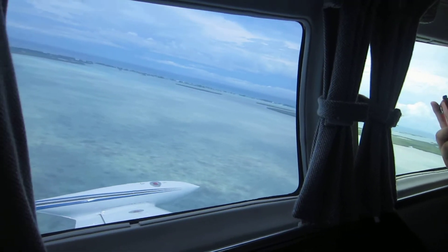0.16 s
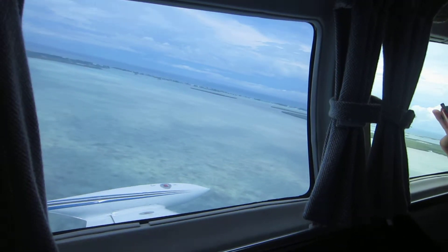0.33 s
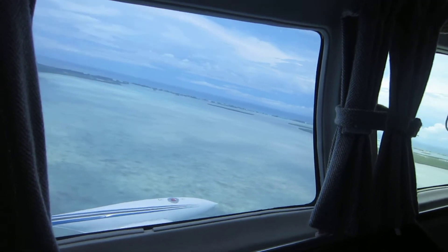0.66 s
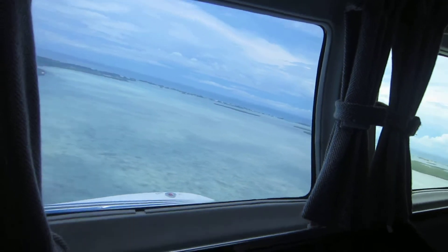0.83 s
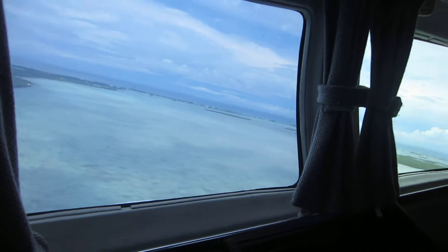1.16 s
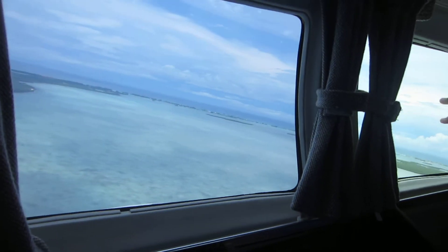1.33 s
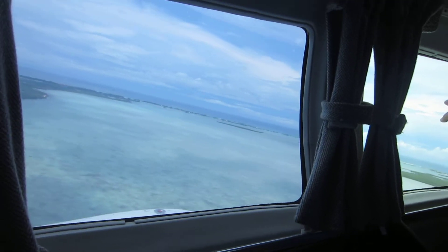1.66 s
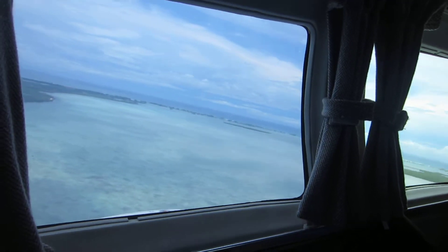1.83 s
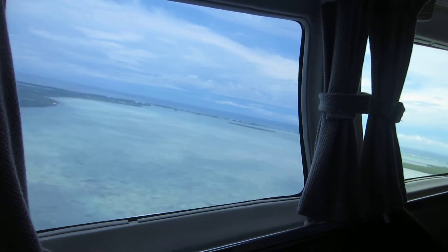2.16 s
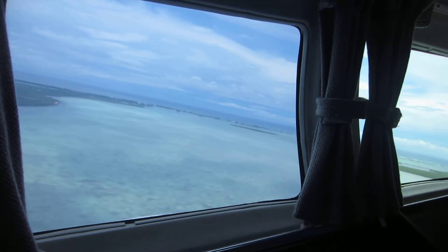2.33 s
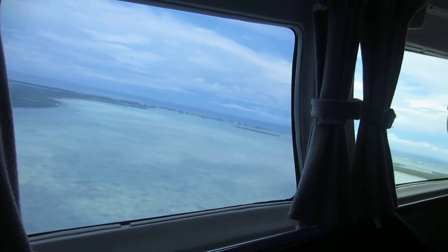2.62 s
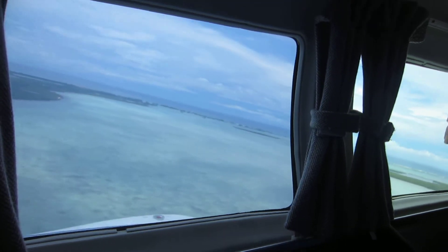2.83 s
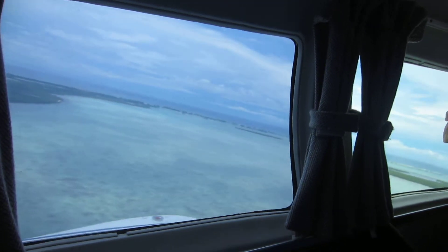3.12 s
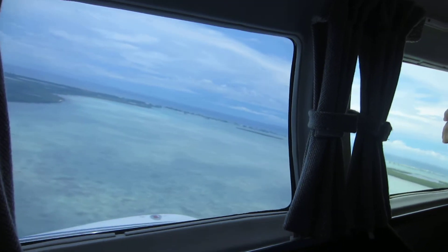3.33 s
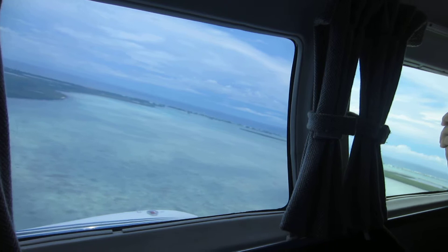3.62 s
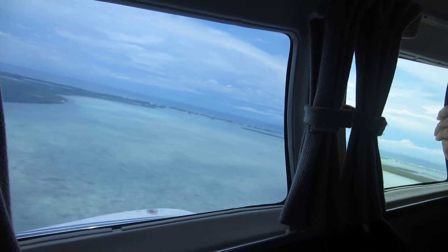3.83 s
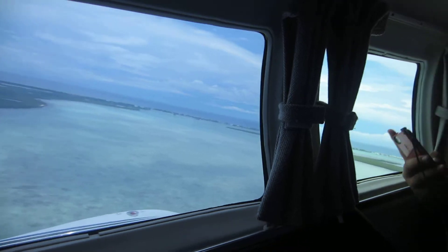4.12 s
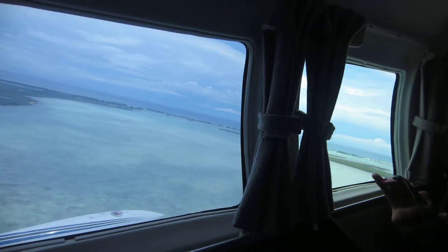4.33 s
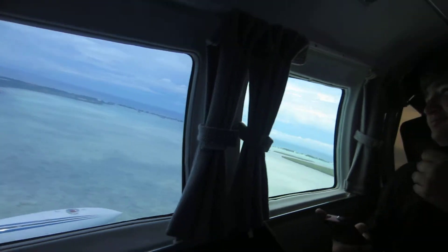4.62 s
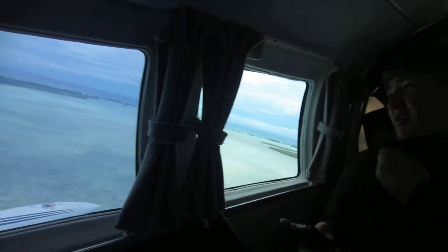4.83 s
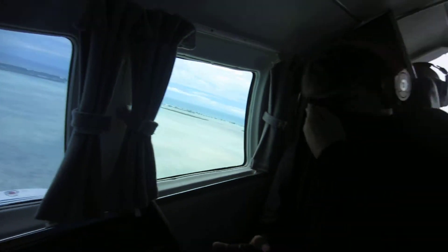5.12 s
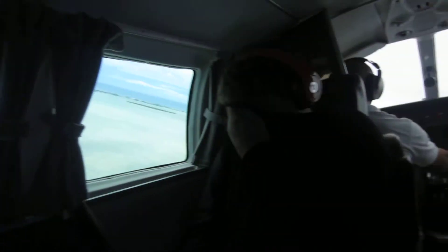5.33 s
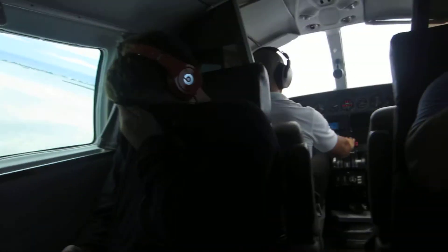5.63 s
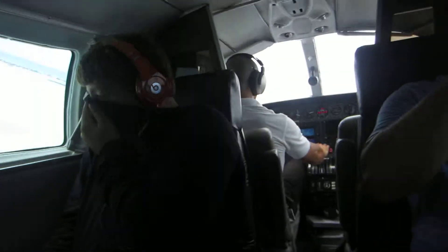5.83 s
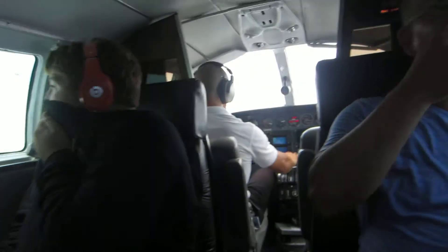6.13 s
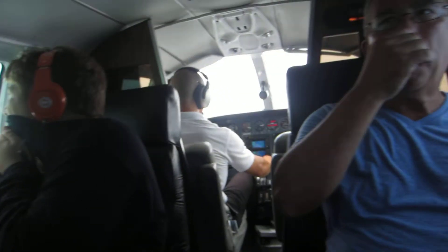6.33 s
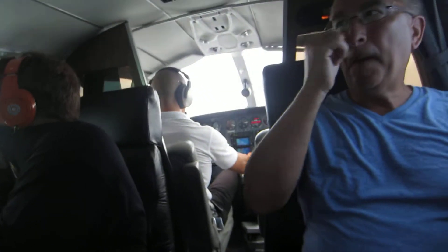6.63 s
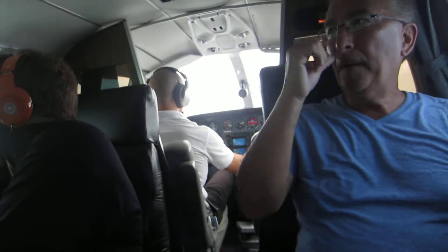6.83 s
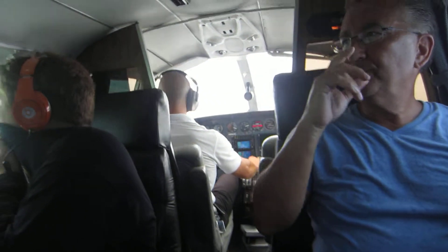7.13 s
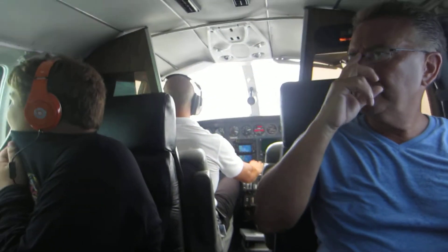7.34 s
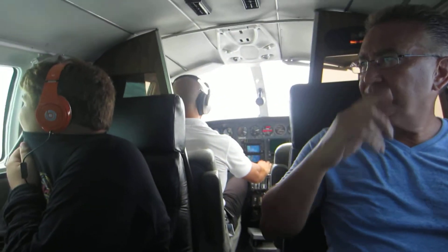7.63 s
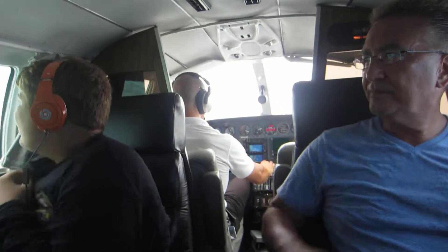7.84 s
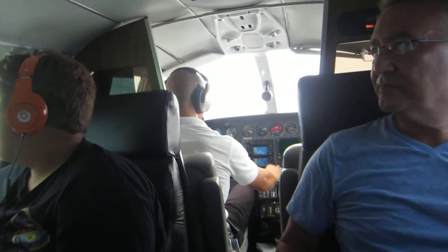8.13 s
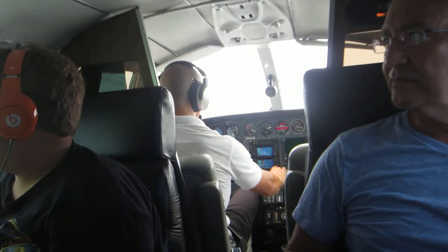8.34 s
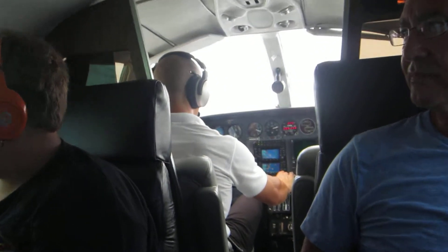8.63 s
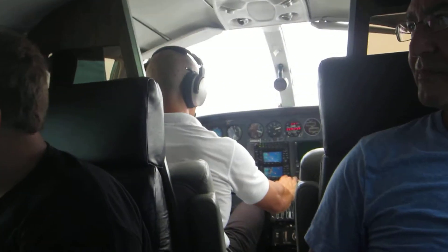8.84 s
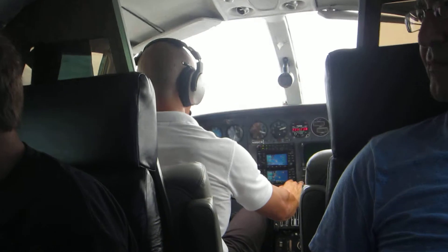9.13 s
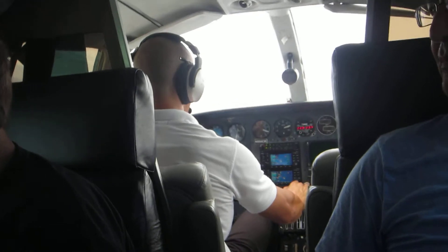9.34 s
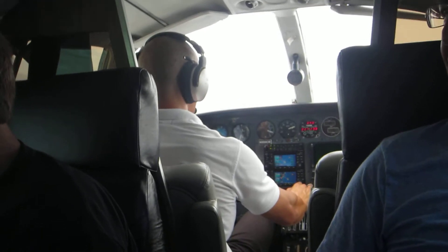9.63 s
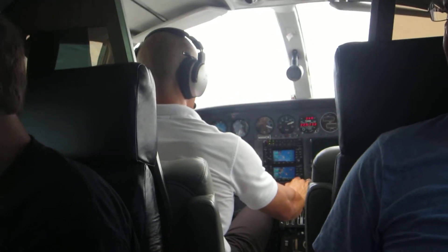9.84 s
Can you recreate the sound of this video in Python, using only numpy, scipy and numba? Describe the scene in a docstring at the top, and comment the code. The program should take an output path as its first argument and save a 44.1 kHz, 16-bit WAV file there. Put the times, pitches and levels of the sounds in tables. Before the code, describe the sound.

Twin propeller engines drone in a small cabin, their low hum swelling and fading over constant rushing air.

```python
"""A deep, slowly beating hum over a steady roar of air: the cabin of a small twin-engined propeller plane.
Two six-cylinder engines with three-blade propellers run slightly apart in speed, so their tones beat at
the difference frequency, faster as the power is eased back. The turbulent slipstream roars on the hull.
A hand-held camera turns from a window to the aisle through the cabin's standing waves. Fingers knock on
it, its zoom switches a treble dip on and off with a click, and its gain control rides the swells."""
import sys
import numpy as np
from scipy import signal
from scipy.fft import rfft, irfft, next_fast_len
from scipy.io import wavfile
from scipy.ndimage import uniform_filter1d
from numba import njit

SR = 44100
rng = np.random.default_rng(int(sys.argv[2]) if len(sys.argv) > 2 else 0)


def to_wav(sig):
    """Store sig (one row per channel, or 1-D mono) as 16-bit WAV at the path in sys.argv[1].

    Samples outside -1..1 are clipped; the rate is SR.
    """
    pcm = np.clip(np.atleast_2d(sig), -1, 1) * 32767
    pcm = np.round(pcm).astype(np.int16)
    wavfile.write(sys.argv[1], SR, pcm.T)  # frames by channels


N = 439677

# Slipstream spectrum through the hull: f/Hz, density at window/dB, at aisle/dB, side minus mid/dB
ROAR_SPECTRUM = [(30, -78.5, -77, -28), (42, -63, -59.5, -25), (75, -60.5, -58.5, -20.5),
                 (100, -54, -52.5, -9), (170, -54.5, -52.5, -11), (412, -58.5, -53, -23),
                 (590, -60, -51.5, -17.5), (865, -67, -62.5, -18), (1330, -68, -72, -12.5),
                 (1680, -73.5, -71.5, -9.5), (2420, -77, -75.5, -10), (3980, -88, -86, -8),
                 (7060, -96.5, -94.5, -5), (9570, -103, -103, -4), (11900, -122, -122, -1)]
# Panel and cavity resonances, and a narrow dip in the hiss at 12 kHz:
# f/Hz, width/Hz, gain at window/dB, at aisle/dB
RESONANCES = [(544.4, 81, 9, -5.5), (1039, 45, 7.5, 7), (1321, 62, 5, 3.5), (1452, 110, 1, 8.5),
              (7800, 760, 3.5, 5), (12000, 900, -8.5, -8.5)]
# Finger contacts on the camera: t/s, ring level/dB, click level/dB, contact time/s
KNOCKS = [(3.292, -11, -32, 0.004), (3.599, -10, -20.5, 0.0022), (5.029, -60, -48, .0004)]
# Modes of the camera body: f/Hz, level/dB, t60/s
BODY_MODES = [(714, 4.5, .05), (467, -0.5, 0.05), (190, -10.5, 0.051)]
# Switching on, then off, of the zoom's filter: t/s, click level/dB
ZOOM_SWITCHES = [(6.873, -32), (9.457, -37)]
# Response of that filter: f/Hz, gain/dB
ZOOM_DIP = [(2000, 0), (3200, -3.5), (4100, -13), (4900, -7), (6000, -4.5), (8500, -2), (10500, 1)]
# Camera's course: t/s, turn (0 window, 1 aisle), lean to the slower engine/dB, roar gain/dB
CAMERA_COURSE = [(0, 0, -0.5, -1.3), (.5, 0.11, 1.6, 1.5), (1, 0, -0.1, -0.1), (4.2, 0, .1, 1.14),
                 (4.8, 0.07, 2.5, 0), (5.2, 0.31, -3.5, 0.3), (5.5, .32, .1, 0.7), (6, 0.59, 0.8, 0.6),
                 (6.4, .99, 2.3, 0.1), (7.6, .99, -1.5, 0.95), (8.1, 0.9, -0.6, 2), (8.7, .99, 2, -0.1),
                 (9.4, 0.96, 0.9, 0.4), (9.97, 1, 4, 1)]
# Blade-passing rates of the two propellers: t/s, mean f/Hz, difference/Hz
BLADE_RATES = [(0, 130.7, .445), (2.028, 130.6, .343), (3.084, 130.6, .83), (4.073, 130.3, .455),
               (5.1, 131.1, .744), (6.045, 130.7, 1.01), (6.436, 129.7, 2.463), (7.093, 128.8, 2.479),
               (7.498, 128.4, 1.696), (8.44, 127.6, 1.3), (9.1, 125.6, 1.62), (9.97, 123, 1.56)]
# Blade harmonics 1-5 in the standing waves: slower engine's level/dB at window, half turned and at aisle,
# the same three for the faster engine, loss below FULL_RATE_HZ/(dB/Hz), share of the lean (0-1)
BLADE_TONES = [(-12, -19, -19, -17.5, -21, -19.5, 0.1, 0.97),
               (-32.5, -25.5, -26.5, -33.5, -27.5, -31.5, -0.26, 0.81),
               (-42.5, -30.5, -33.5, -41, -32.5, -30, 2.5, .05),
               (-40.5, -37.5, -38.5, -42, -38.1, -39, 1.5, .05),
               (-47.5, -44, -42, -46.5, -43.1, -41, 4.5, .05)]
# Extra path of the faster engine's fundamental: turn (0-1), path/cycles
FUNDAMENTAL_PATH = [(.3, 0.51), (.6, 0.027)]
# Exhaust and crankcase lines: multiple of the four-stroke cycle rate, level at window/dB, at aisle/dB,
# extra path of the faster engine/cycles
ENGINE_ORDERS = [(3, -45, -44.5, 0.24), (4, -45, -42.5, .4), (5, -50, -49, 0.058), (7, -47, -50, .7),
                 (8, -39.5, -38.5, .35), (9, -43.5, -37, .55), (10, -40, -38.5, 0.69), (11, -47, -41, 0.16),
                 (14, -56.5, -45.5, .8), (15, -49, -53.5, .6), (17, -45, -52.5, .9), (48, -51, -56, .2)]

UPPER_PATH = (.52, 0, .42, .97)  # extra path/cycles of the faster engine's harmonics 2-5, at any turn
PASSES_PER_CYCLE = 6  # three blades, two revolutions per four-stroke cycle
FULL_RATE_HZ, HALF_TURNED = 128.3, .32
CLICK_CYCLES = 5.4  # a click's bandwidth times its contact time
LEFT_LEAN, TOP_HZ = .12, 15700  # share of treble added left and taken right; low-pass edge


def undb(db):
    """Amplitude ratio from the logarithmic decibel scale."""
    return 10 ** (np.asarray(db) / 20)


def curves(table):
    """Linear interpolation of (t/s, value, ...) rows to one value a sample."""
    times, *columns = np.transpose(table)
    return [np.interp(np.arange(N) / SR, times, c) for c in columns]


def walk(rate_hz):
    """Low-pass noise: random steps smoothed twice, with a spread near 1."""
    hold = int(SR / rate_hz)
    steps = np.repeat(rng.standard_normal(N // hold + 1), hold)
    return 1.2 * uniform_filter1d(uniform_filter1d(steps, hold), hold)[:N]


def slipstream(aisle, slow, fast):
    """Boundary-layer turbulence: noise filtered by the hull's resonances, modulated by the blade passes."""
    size = next_fast_len(N)
    hz = np.maximum(np.arange(size // 2 + 1) * SR / size, 1)
    knots_hz, *columns = np.transpose(ROAR_SPECTRUM)
    window_db, aisle_db, side_db = (np.interp(np.log(hz), np.log(knots_hz), c) for c in columns)
    for centre_hz, width_hz, window_peak_db, aisle_peak_db in RESONANCES:
        bump = 1 / (1 + (2 * (hz - centre_hz) / width_hz) ** 2)
        window_db += window_peak_db * bump
        aisle_db += aisle_peak_db * bump
    mid, side = rfft(rng.standard_normal((2, size))) * np.sqrt(SR / 2)
    side = side * undb(side_db) + LEFT_LEAN * hz / (hz + 2000) * mid
    stereo = np.array([mid + side, mid - side])
    at_window, at_aisle = (irfft(stereo * undb(db), size)[:, :N] for db in (window_db, aisle_db))
    roar = at_window + (at_aisle - at_window) * aisle
    hiss = signal.sosfilt(signal.butter(2, 2500, "highpass", fs=SR, output="sos"), roar)
    treble_flutter = (undb(.8 * walk(8.2)) - 1) * hiss  # a quick random flicker in the hiss's level
    throb = 1 + .05 * (np.cos(2 * np.pi * slow) + np.cos(2 * np.pi * fast))
    gusts = undb(.5 * walk(2.5))
    return (roar + treble_flutter) * throb * gusts


def finger_knocks():
    """Impact excitation: a click and the camera body's damped modes, duller after a longer contact."""
    out, t = np.zeros(N), np.arange(SR // 8) / SR
    modes = sum(undb(db) * np.sin(2 * np.pi * hz * t) * np.exp(-np.log(1000) * t / t60)
                for hz, db, t60 in BODY_MODES)
    for start_s, ring_db, click_db, contact_s in KNOCKS:
        force = np.hanning(int(contact_s * SR) + 3) ** 4
        ring = np.convolve(modes, force / force.sum())[:len(t)]
        burst = rng.standard_normal(len(t)) * np.minimum(t / .001, 1) * np.exp(-t / .0046)
        cutoff_hz = min(CLICK_CYCLES / contact_s, SR / 3)
        click = signal.lfilter(*signal.butter(2, cutoff_hz, fs=SR), burst)
        start = int(start_s * SR)
        out[start:start + len(t)] += undb(ring_db) * ring + undb(click_db) * click
    return out


def engine_orders(aisle, slow, fast):
    """Periodic firing: exhaust and crankcase sound at multiples of the cycle rate; one row an engine."""
    lines = np.zeros((2, N))
    for multiple, window_db, aisle_db, path in ENGINE_ORDERS:
        gain = undb(window_db + (aisle_db - window_db) * aisle)
        start_phase = rng.random()
        for engine, passes in enumerate((slow, fast)):
            cycles = multiple / PASSES_PER_CYCLE * passes + start_phase + engine * path
            lines[engine] += gain * np.cos(2 * np.pi * (cycles + .038 * walk(6)))
    return lines


def propellers(aisle, lean_db, blade_hz, slow, fast):
    """Blade-passing harmonics, whose levels vary with place in the standing waves; one row an engine."""
    tones = np.zeros((2, N))
    drop_hz = np.maximum(FULL_RATE_HZ - blade_hz, 0)
    paths = (np.interp(aisle, *np.transpose(FUNDAMENTAL_PATH)), *UPPER_PATH)
    for k, (*levels_db, loss, share) in enumerate(BLADE_TONES):
        waver_db = min(.3 + .5 * k, 1.5)  # gusts on the blades shake the higher tones more
        pair = (levels_db[:3], lean_db, slow), (levels_db[3:], -lean_db, fast + paths[k] / (k + 1))
        for engine, (places_db, lean, passes) in enumerate(pair):
            db = np.interp(aisle, (0, HALF_TURNED, 1), places_db) + share * lean - loss * drop_hz
            phase = 2 * np.pi * (k + 1) * passes - 1.445 * k  # harmonics line up into suction pulses
            tones[engine] -= undb(db + waver_db * walk(14)) * np.cos(phase)
    return tones


def beating_hum(engines, aisle):
    """Superposition: the two engines' tones beat; level and time differences place the hum in stereo."""
    mid = np.sqrt(2) * engines.sum(axis=0)
    # the hum leans left at the window, right at the aisle, where each engine also favours its own side
    side = (.035 - .08 * aisle) * mid + .06 * aisle * (engines[0] - engines[1])
    side -= 3.5e-5 * SR * np.gradient(mid) * (1 - .6 * aisle)  # it reaches the right a little sooner
    return np.array([mid + side, mid - side])


def scene():
    """Linear superposition of roar, knocks and hum at the turning camera."""
    blade_hz, gap_hz = curves(BLADE_RATES)
    aisle, lean_db, roar_db = curves(CAMERA_COURSE)
    passes = np.cumsum(blade_hz) / SR
    lead = np.cumsum(gap_hz) / SR - .016
    slow, fast = passes - lead / 2, passes + lead / 2  # each propeller's phase, in blade passes
    engines = propellers(aisle, lean_db, blade_hz, slow, fast) + engine_orders(aisle, slow, fast)
    return undb(roar_db) * slipstream(aisle, slow, fast) + finger_knocks() + beating_hum(engines, aisle)


@njit
def follow(rectified, level, attack_s, release_s):
    """Envelope detection: a first-order lag with separate time constants for rise and fall."""
    out = np.empty(len(rectified))
    for i, x in enumerate(rectified):
        level += (x - level) / (SR * (attack_s if x > level else release_s))
        out[i] = level
    return out


def record(dry):
    """Filtering and compression in the camera: zoom dip, gain control, switch clicks and a low-pass."""
    size = next_fast_len(N)
    dip_db = np.interp(np.arange(size // 2 + 1) * SR / size, *np.transpose(ZOOM_DIP))
    dipped = irfft(rfft(dry, size) * undb(dip_db), size)
    on, off = (int(s * SR) for s, _ in ZOOM_SWITCHES)
    sound = np.concatenate([dry[:, :on], dipped[:, on:off], dry[:, off:]], axis=1)
    level = follow(np.abs(sound).max(axis=0), undb(-12.5), attack_s=.012, release_s=1.2)
    sound *= (undb(-7) / np.maximum(level, undb(-12))) ** .74  # about 4:1 above the -12 dB threshold
    for s, click_db in ZOOM_SWITCHES:
        sound[:, int(s * SR)] += undb(click_db)
    return signal.sosfilt(signal.ellip(8, .2, 70, TOP_HZ, fs=SR, output="sos"), sound)


dry = scene()
out = record(dry)
to_wav(out)
```